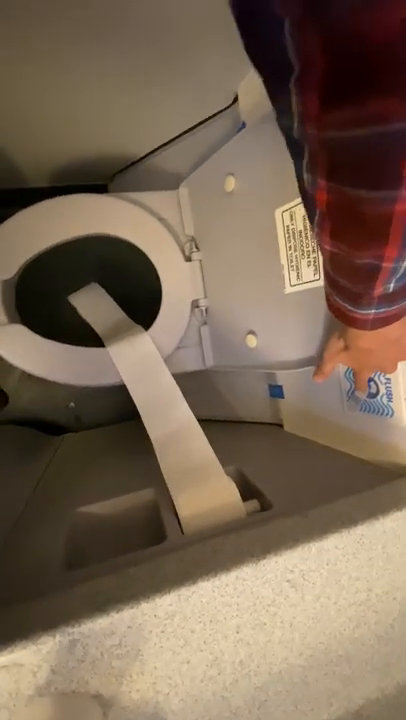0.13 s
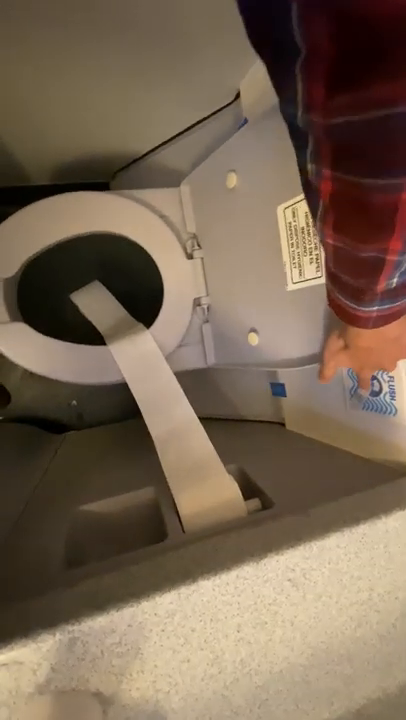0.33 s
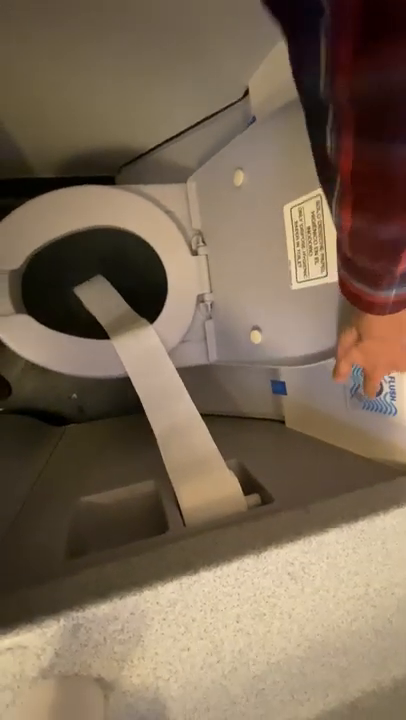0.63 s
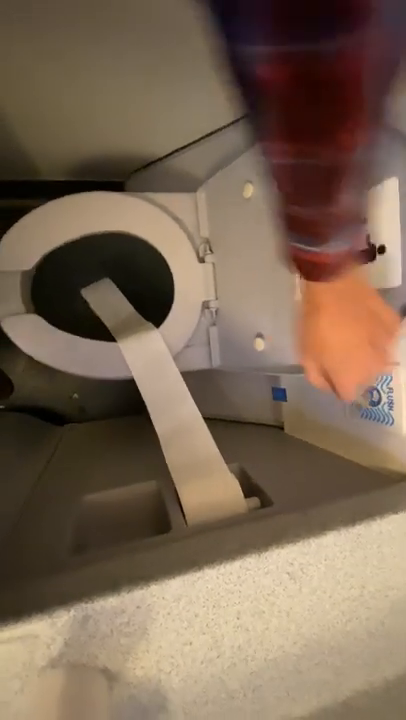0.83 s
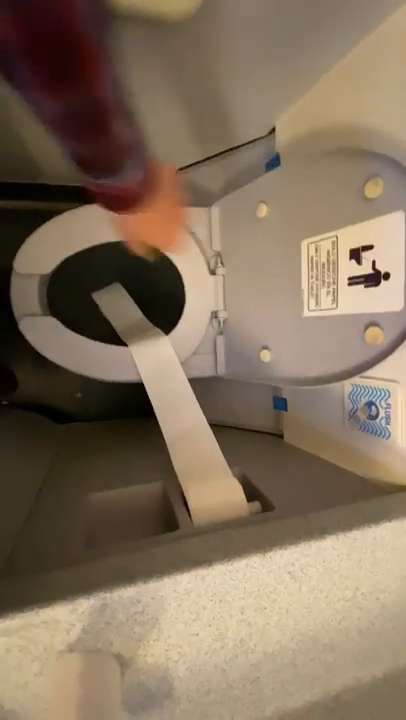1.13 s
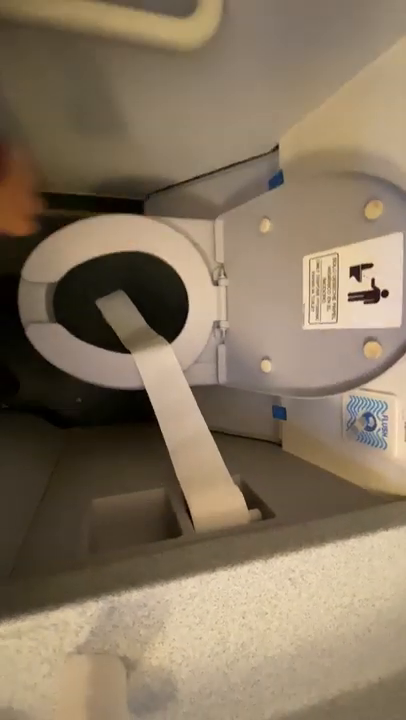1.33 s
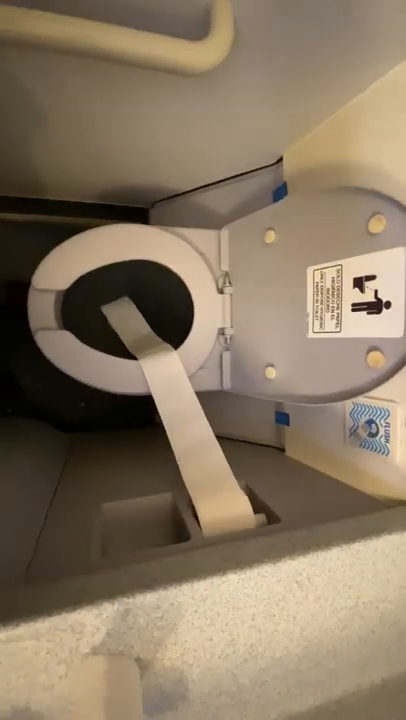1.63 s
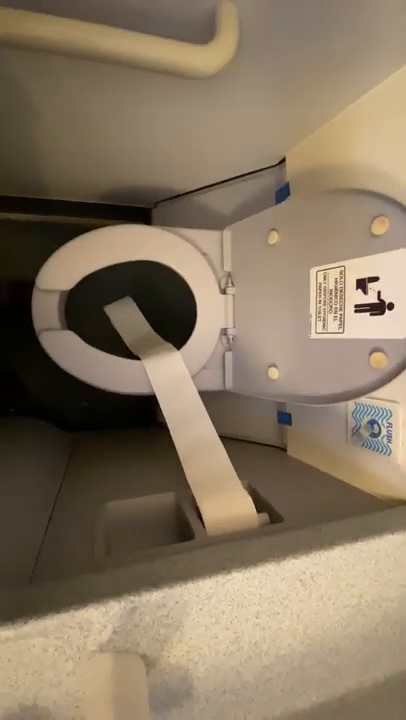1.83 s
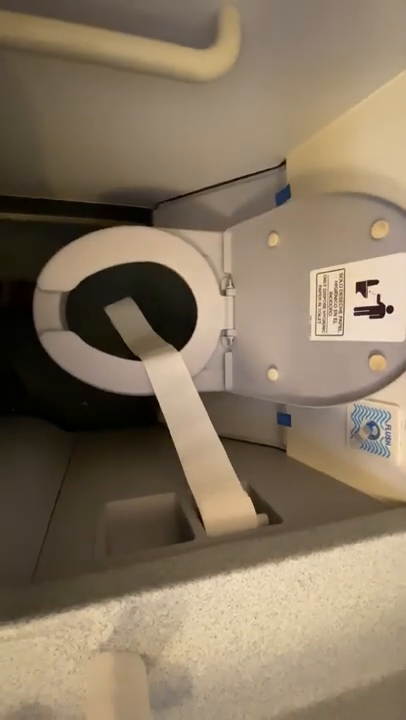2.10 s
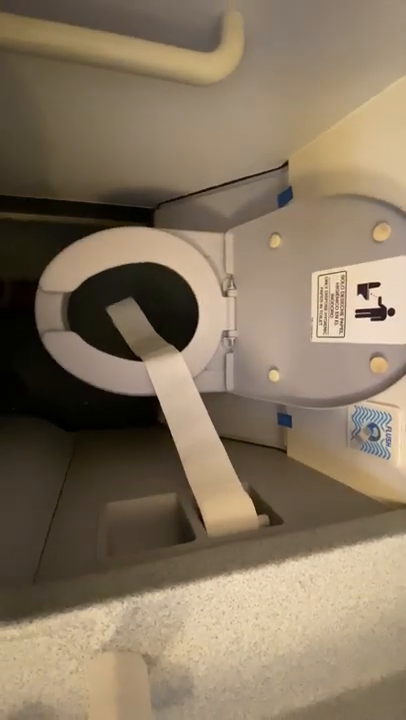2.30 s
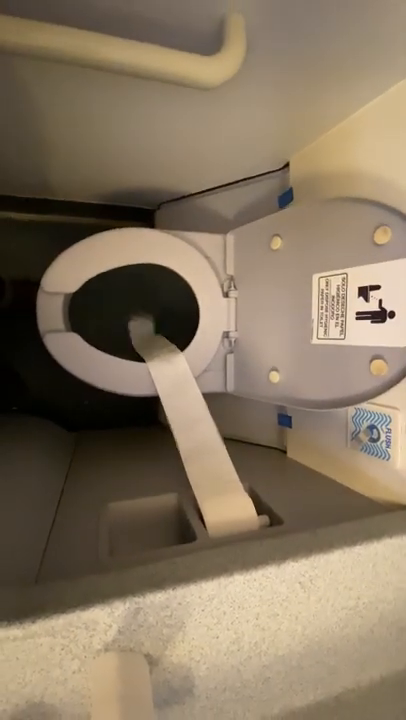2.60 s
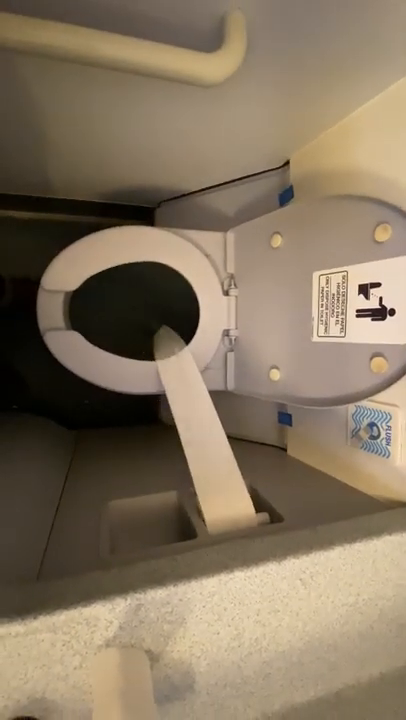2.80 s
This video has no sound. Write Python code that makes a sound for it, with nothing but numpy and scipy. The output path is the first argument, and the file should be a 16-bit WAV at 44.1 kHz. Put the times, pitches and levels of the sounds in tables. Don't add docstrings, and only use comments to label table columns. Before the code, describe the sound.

A vacuum toilet valve puffs, rinse water sprays, then a roaring suction gulp over cabin rumble.

```python
import sys
import numpy as np
from scipy import signal
from scipy.fft import rfft, irfft
from scipy.io import wavfile

SR = 44100
rng = np.random.default_rng(int(sys.argv[2]) if len(sys.argv) > 2 else 0)


def attenuation_scalar(level_db):
    decades = np.asarray(level_db, float) / 20
    return 10 ** decades


def wrap_up_sound(samples):
    columns = np.atleast_2d(samples).T
    tamed = np.clip(columns, -1, 1)
    steps = np.round(tamed * 32767).astype(np.int16)
    wavfile.write(sys.argv[1], SR, steps)


N = 130095
PAD = 2048
DUCK_DB, BASS_DUCK_DB = -2, -10


def time():
    return np.arange(N) / SR


def bins():
    return np.maximum(np.arange(N // 2 + 1) * SR / N, 1)


def rms_one(x):
    return x / np.sqrt(np.mean(x ** 2) + 1e-20)


def at_hz(points, hz):
    point_hz, value = np.transpose(points)
    return np.interp(np.log(hz), np.log(point_hz), value)


def noise():
    return rng.standard_normal((2, N))


def drift(rate_hz):
    r = np.exp(-2 * np.pi * rate_hz / SR)
    settled = signal.lfilter([1], [1, -2 * r, r * r], rng.standard_normal(N + SR))[SR:]
    return rms_one(settled)


def colour(x, spectrum, peaks=()):
    hz = bins()
    db = at_hz(spectrum, hz)
    for peak_hz, width_hz, boost_db in peaks:
        db = db + boost_db / (1 + (2 * (hz - peak_hz) / width_hz) ** 2)
    return rms_one(irfft(rfft(x) * attenuation_scalar(db), N))


def resonate(x, hz, width_hz):
    r = np.exp(-np.pi * width_hz / SR)
    for _ in range(2):
        x = signal.lfilter([1, 0, -1], [1, -2 * r * np.cos(2 * np.pi * hz / SR), r * r], x)
    return rms_one(x)


def play(x, rows, split_hz):
    s, db, bright_db = np.transpose(rows)
    gain = attenuation_scalar(np.interp(time(), np.r_[s[0] - .004, s, s[-1] + .05], np.r_[-100, db, -100]))
    bright = attenuation_scalar(np.interp(time(), s, bright_db))
    upper = irfft(rfft(x) / (1 + (split_hz / bins()) ** 6), N)
    return gain * (x - upper + bright * upper)


def ducking():
    from_s, rise_s = 2.66, .05
    return np.clip((time() - from_s) / rise_s, 0, 1)


def cabin():
    # hz, level_db per Hz
    cabin_colour = [(22, -19.5), (55, -7), (240, -5), (330, -13), (1100, -16.5), (3800, -41), (9000, -53),
                    (15500, -65)]
    # centre_hz, width_hz, boost_db
    hollow_modes = [(68, 9.7, 9.5), (98.4, 19, 3.5), (147.4, 20.4, 8.5), (185, 12, -8.5), (219.4, 50, 3),
                    (401.3, 53, 7), (487, 28, -6), (521.7, 24, 7), (719, 10.8, 8.5), (976, 40, 5),
                    (1133, 27, -8.5), (4110, 150, 0.5), (4550, 140, 1), (5400, 4300, 3.5)]
    flicker = [.7, .8, 1.1, .9, .5]
    full = rfft(colour(noise(), cabin_colour, hollow_modes))
    region = np.digitize(bins(), [185, 350, 1000, 3000])
    duck = ducking()
    out = 0
    for k, flicker_db in enumerate(flicker):
        bass_duck_db = (k == 0) * BASS_DUCK_DB * duck
        out = out + irfft(full * (region == k), N) * attenuation_scalar(flicker_db * drift(10.0) + bass_duck_db)
    level_db = -17
    return attenuation_scalar(level_db + DUCK_DB * duck) * out


def drones():
    # pitch_hz, wander_hz, level_db
    strands = [
        (69.7, 3.76, -32),
        (161.1, 4.16, -35.5),
        (213.5, 3.96, -36.5),
        (408, 8.56, -43.5),
    ]
    out = 0
    for hz, wander_hz, db in strands:
        turn = 2 * np.pi * np.cumsum(hz + wander_hz * drift(4.06)) / SR
        out = out + attenuation_scalar(db + 2.87 * drift(1.02)) * np.sqrt(2) * np.sin(turn)
    return out * attenuation_scalar((DUCK_DB + BASS_DUCK_DB / 2) * ducking()) * np.array([[1], [0]])


def surges():
    # start_s, length_s, from_hz, to_hz, level_db
    hull_booms = [(.0, 0.11, 151.6, 156, -21), (.07, 0.07, 225, 223, -23), (0.194, 0.16, 408, 408, -25),
                  (0.231, 0.094, 153, 148.5, -19), (0.245, 0.059, 520, 517, -24),
                  (0.376, .06, 206, 216, -16.5), (.52, 0.17, 150, 174, -21), (0.565, 0.12, 216, 215, -21.5),
                  (0.612, 0.14, 410, 407.5, -25), (0.657, 0.15, 161.8, 144.6, -19.5),
                  (0.775, 0.076, 225, 245, -21.5), (0.925, 0.09, 200, 205, -22.5),
                  (1.048, 0.09, 165, 162.5, -28.5), (1.142, 0.082, 145, 166.4, -19.5),
                  (1.168, 0.064, 226, 225, -18.5), (1.236, 0.065, 408, 408, -37),
                  (1.443, 0.1, 215, 206, -20.5), (1.5, 0.17, 151.8, 151, -20.5),
                  (1.925, 0.094, 1002, 1005, -30), (1.969, 0.086, 212, 216, -23),
                  (2.146, 0.11, 73.3, 73.5, -20.5), (2.298, 0.13, 164.2, 168, -18.5)]
    # start_s, length_s, from_hz, to_hz, level_db
    flush_rings = [(2.545, .045, 222, 222, -22), (2.595, .075, 160, 162, -20), (2.58, .03, 2550, 2520, -37),
                   (2.61, .03, 2530, 2510, -37), (2.66, .035, 385, 380, -24), (2.688, .04, 225, 215, -19),
                   (2.675, .035, 2200, 2230, -30), (2.705, .03, 2200, 2180, -28),
                   (2.69, .05, 2535, 2535, -33), (2.68, .055, 875, 860, -24), (2.685, .03, 1540, 1520, -26),
                   (2.705, .025, 1480, 1480, -24), (2.735, .025, 1520, 1480, -26),
                   (2.71, .055, 2790, 2810, -38), (2.715, .05, 725, 725, -26), (2.735, .05, 195, 220, -18),
                   (2.72, .115, 392, 385, -24), (2.8, .045, 228, 212, -22), (2.845, .055, 222, 215, -22),
                   (2.875, .055, 75, 75, -25), (2.875, .025, 1240, 1240, -27), (2.905, .04, 860, 870, -25),
                   (2.172, .014, 6350, 6250, -37)]
    out = np.zeros(N + SR)
    for s, length_s, from_hz, to_hz, db in hull_booms + flush_rings:
        part = np.arange(int(length_s * SR)) / (length_s * SR)
        glide_hz = from_hz + (to_hz - from_hz) * part
        turn = 2 * np.pi * (rng.random() + np.cumsum(glide_hz) / SR)
        first = max(int(s * SR), 0)
        out[first:first + len(part)] += attenuation_scalar(db) * np.sqrt(2) * np.sin(np.pi * part) * np.sin(turn)
    return out[:N] * attenuation_scalar(3.0 * drift(40.0)) * np.array([[1], [0]])


def puffs():
    # start_s, level_db, centre_hz, width_hz, t60_s
    bursts = [
        (1.695, -34.5, 3840, 700, 0.2),
        (1.695, -41, 5400, 1500, 0.25),
        (1.696, -49.5, 8700, 4000, .12),
        (2.069, -40, 5230, 500, 0.11),
        (2.07, -23, 1690, 1500, 0.026),
        (2.078, -35, 9400, 4500, 0.015),
        (2.110, -27, 2150, 700, 0.12),
        (2.168, -29, 4800, 4000, 0.03),
        (2.199, -31, 7400, 5000, 0.064),
    ]
    attack_s, hold_s = .003, .014
    out = 0
    for s, db, hz, width_hz, t60_s in bursts:
        age = np.maximum(time() - s, 0)
        tail_db = -60 * np.maximum(age - hold_s, 0) / t60_s
        attack = np.minimum(age / attack_s, 1)
        out = out + attenuation_scalar(db + tail_db) * attack * resonate(noise(), hz, width_hz)
    return out


def whistles():
    # start_s, length_s, pitch_hz, width_hz, level_db
    edge_tones = [
        (2.066, .055, 5230, 130, -37),
        (2.52, .05, 5200, 120, -37),
        (2.545, .035, 5650, 120, -36),
        (2.66, .14, 2530, 50, -36),
        (2.63, .09, 5040, 500, -33),
    ]
    out = 0
    for s, length_s, hz, width_hz, db in edge_tones:
        part = np.clip((time() - s) / length_s, 0, 1)
        swell = np.sqrt(np.abs(np.sin(np.pi * part ** 1.6)))
        out = out + attenuation_scalar(db) * swell * resonate(noise(), hz, width_hz)
    return out


def spray():
    # time_s, level_db, brightness_db
    flow = [
        (2.069, -35, -18),
        (2.09, -27.5, -19),
        (2.12, -33, -1),
        (2.16, -28, 4),
        (2.2, -22, -4),
        (2.24, -31.5, 6),
        (2.3, -32.5, 9),
        (2.4, -32.5, 4),
        (2.5, -40, 3),
    ]
    # hz, level_db per Hz
    steel_colour = [(600, -14), (1500, -4), (2800, 7.5), (4000, 1.5), (5800, -0.5), (8000, -4),
                    (11500, -13), (15500, -20.5)]
    drops_per_s, spread_db, drop_share = 6000, 2.0, .4
    hits = rng.random((2, N)) < drops_per_s / SR
    size_db = spread_db * np.minimum(rng.exponential(1, (2, N)), 5)
    drops = hits * attenuation_scalar(size_db) * np.sign(noise())
    mix = np.sqrt(drop_share) * rms_one(drops) + np.sqrt(1 - drop_share) * noise()
    flutter_db = 1.2
    return attenuation_scalar(flutter_db * drift(38.0)) * play(colour(mix, steel_colour), flow, split_hz=8100)


def fill():
    start_s, length_s, level_db = 2.072, 0.06, -32
    from_hz, to_hz, width_hz = 1600, 2486, 300
    part = np.clip((time() - start_s) / length_s, 0, 1)
    turn = 2 * np.pi * np.cumsum(from_hz + (to_hz - from_hz) * part) / SR
    swell = np.sqrt(np.sin(np.pi * part) + 1e-12)
    glide = [drift(width_hz) * np.cos(turn) + drift(width_hz) * np.sin(turn) for _ in range(2)]
    return attenuation_scalar(level_db) * swell * np.array(glide)


def leak():
    # time_s, level_db, brightness_db
    gap_flow = [
        (2.5, -34, 3),
        (2.54, -30.5, -4),
        (2.59, -26.5, -0.5),
        (2.624, -26.5, 7),
        (2.69, -19, 4.5),
        (2.76, -28.5, 4),
        (2.775, -29.5, 2.5),
        (2.87, -25, 0),
        (2.95, -22.5, -2),
    ]
    # hz, level_db per Hz
    gap_colour = [(1500, 5.5), (2600, 3), (3300, 1.5), (5200, 0), (6300, -3.5), (7800, -6.5), (10500, -11),
                  (15500, -22)]
    # centre_hz, width_hz, boost_db
    cavity = [(2530, 120, 4), (3020, 200, -9), (3910, 120, 5), (5200, 600, 3), (5750, 200, 3)]
    flutter_db = 1.2
    return attenuation_scalar(flutter_db * drift(41.0)) * play(colour(noise(), gap_colour, cavity), gap_flow, split_hz=7000)


def gulp():
    # time_s, level_db, brightness_db
    suction = [
        (2.655, -29.5, 7),
        (2.686, -18, 5),
        (2.709, -12, 7),
        (2.757, -12.5, -2),
        (2.775, -15.5, -15),
        (2.81, -17.5, -5),
        (2.86, -21.5, 4),
        (2.9, -19, 2),
        (2.95, -14.5, -7),
    ]
    # hz, level_db per Hz
    roar_colour = [(130, -30), (215, -4), (400, 7.5), (800, 12.5), (1500, -1.5), (2400, -7.5), (2800, 0),
                   (6000, -34)]
    # centre_hz, width_hz, boost_db
    pipe_modes = [(215, 35, 6), (300, 50, -4), (388, 30, 8), (502, 25, 6), (590, 130, -8), (728, 40, 7),
                  (861, 60, 7), (1235, 80, 7), (1520, 170, 8), (1840, 200, 4), (2175, 55, 10),
                  (2300, 40, 6), (2540, 55, 9), (3000, 200, -12)]
    level_db, gurgle_db, gurgle_hz = 0.5, .8, 40
    roar = play(colour(noise(), roar_colour, pipe_modes), suction, split_hz=1700)
    return attenuation_scalar(level_db + gurgle_db * drift(gurgle_hz)) * roar


def cubicle(x):
    t60_s, level_db = .1, -8
    age = np.arange(SR // 4) / SR
    tail = rng.standard_normal((2, len(age))) * attenuation_scalar(-60 * age / t60_s) * (age > .003)
    tail = tail / np.sqrt(np.sum(tail ** 2) / 2)
    return x + attenuation_scalar(level_db) * signal.fftconvolve(x, tail, axes=1)[:, :N]


def spectrum_of(x):
    hz = np.maximum(np.arange(N // 2 + PAD + 1) * SR / (N + 2 * PAD), 1)
    return hz, rfft(np.pad(x, ((0, 0), (PAD, PAD)), "reflect"))


def back(spectrum):
    return irfft(spectrum, N + 2 * PAD)[:, PAD:-PAD]


def ports(field, lead):
    # hz, likeness 0-1
    likeness = [(60, .9985), (150, .994), (230, .93), (300, .5), (620, .55), (1000, .7), (1900, .6),
                (5500, .72)]
    # hz, left_minus_right_db
    balance = [(260, -0.5), (305, -5.5), (345, 15.5), (440, 6.5), (500, 1), (1000, 2.5), (1700, 2.5),
               (2600, -0.5)]
    hz, (a, b) = spectrum_of(field)
    alike = at_hz(likeness, hz)
    tilt = attenuation_scalar(at_hz(balance, hz) / 2)
    phase = np.interp(hz, *np.transpose(lead))
    right = (alike * a + np.sqrt(1 - alike ** 2) * b) * np.exp(1j * phase)
    return back(np.array([a * tilt, right / tilt]))


def scene():
    # hz, phase_radians
    room_lead = [(270, 0), (440, .5), (520, 2.5), (1300, 2.4), (1800, 3.7), (2600, 2.8), (4400, 4.2),
                 (5400, 6.2), (16000, -6.4)]
    # hz, phase_radians
    drain_lead = [(300, 0), (450, 2.1), (1000, 2.6), (1200, .6), (2000, .3), (2400, 2.7), (5400, 6.2),
                  (16000, -6.4)]
    # hz, phase_radians
    surge_lead = [(300, 0), (600, 1.3), (3000, 1.4)]
    bowl = cubicle(puffs() + whistles() + spray() + fill() + leak())
    room = ports(cabin() + drones() + bowl, room_lead)
    return room + ports(cubicle(gulp()), drain_lead) + ports(surges(), surge_lead)


def band_limit(x):
    return signal.sosfilt(signal.butter(12, 17100, fs=SR, output="sos"), x)


def record(dry):
    # hz, gain_db
    mid_gap = [(12200, 0.5), (12600, 8), (13000, -14), (13150, -50), (14100, -50), (14200, -12),
               (14600, 5.5)]
    # hz, gain_db
    side_gap = [(9500, -0.5), (9750, -14), (10150, -16), (10250, -50), (10950, -61), (11020, -10),
                (11800, 1.5), (15000, 8), (15700, -10)]
    clip, knee, top_hz = .96, 5, 15750
    soft = dry / (1 + np.abs(dry / clip) ** knee) ** (1 / knee)
    hz, (left, right) = spectrum_of(soft)
    mid = (left + right) / 2 * attenuation_scalar(at_hz(mid_gap, hz))
    side = (left - right) / 2 * attenuation_scalar(at_hz(side_gap, hz))
    mix = back(np.array([mid + side, mid - side]) * (hz < top_hz))
    return band_limit(mix)


dry = scene()
out = record(dry)
wrap_up_sound(out)
```